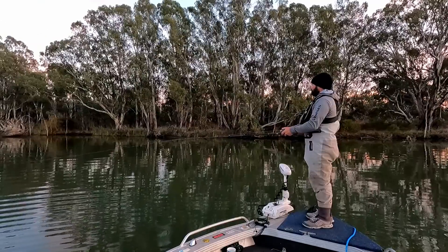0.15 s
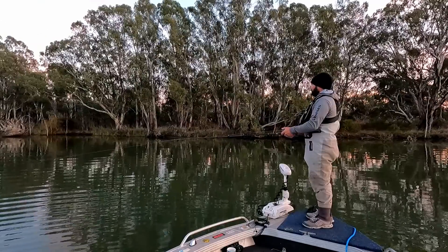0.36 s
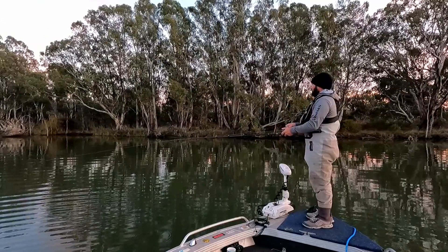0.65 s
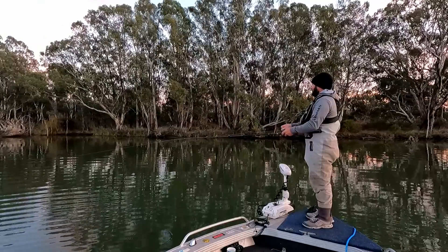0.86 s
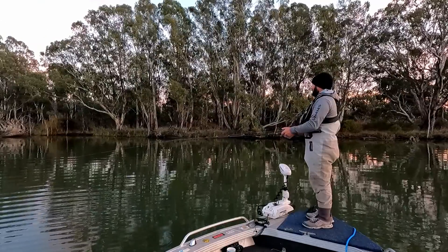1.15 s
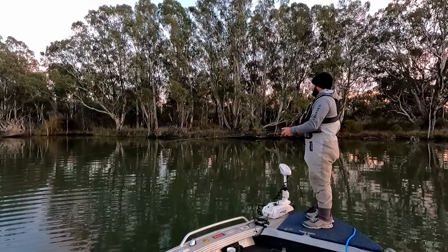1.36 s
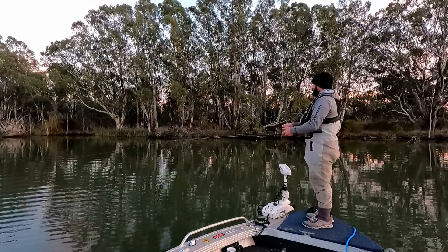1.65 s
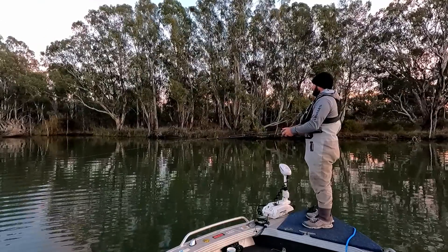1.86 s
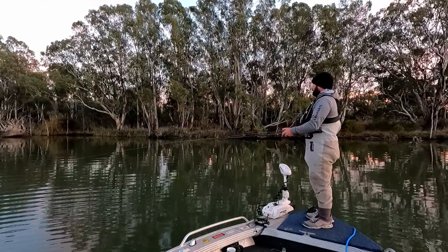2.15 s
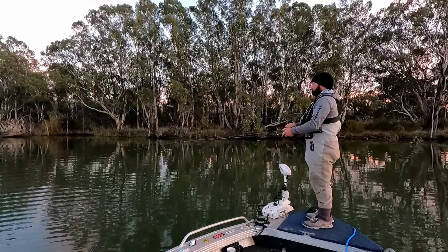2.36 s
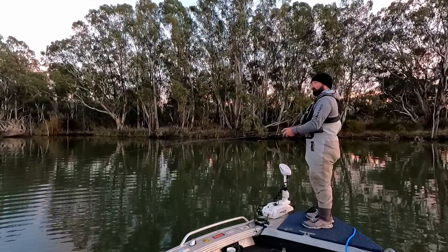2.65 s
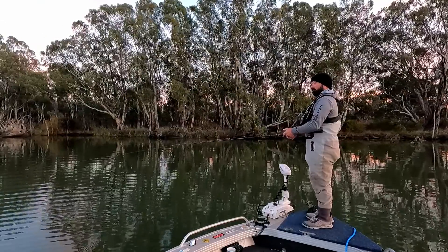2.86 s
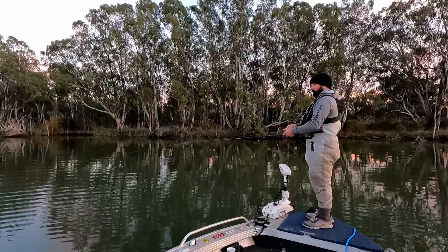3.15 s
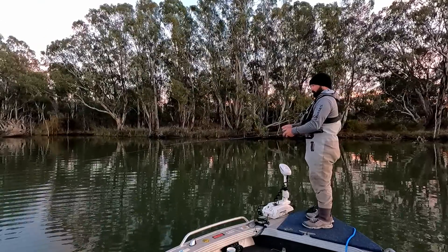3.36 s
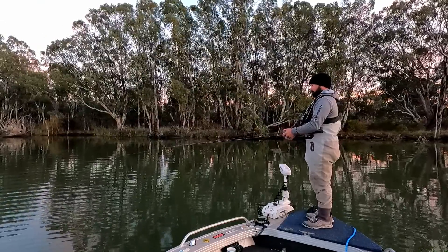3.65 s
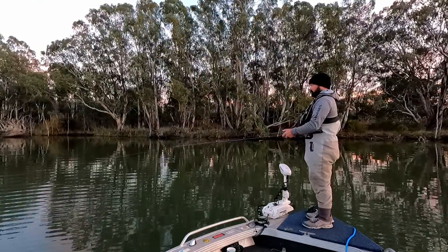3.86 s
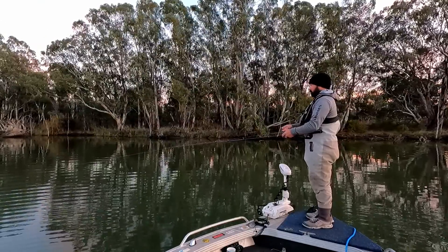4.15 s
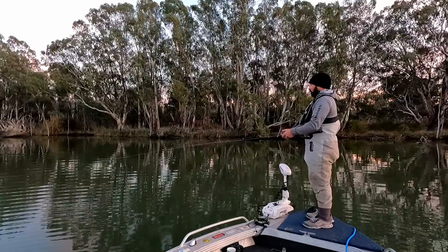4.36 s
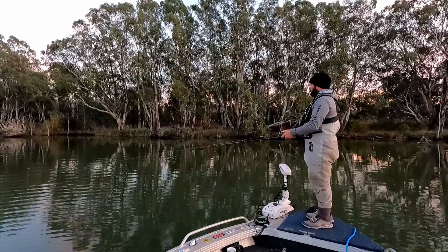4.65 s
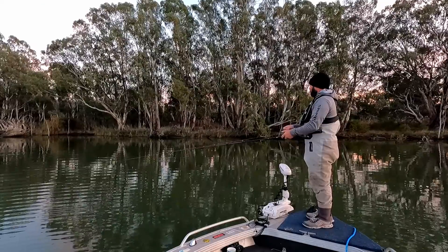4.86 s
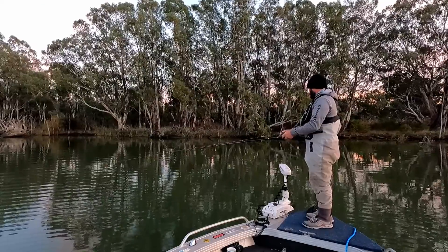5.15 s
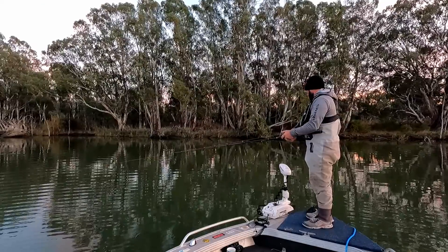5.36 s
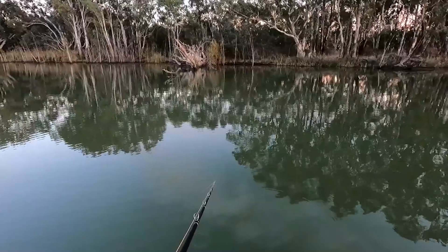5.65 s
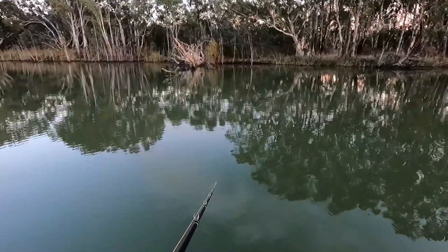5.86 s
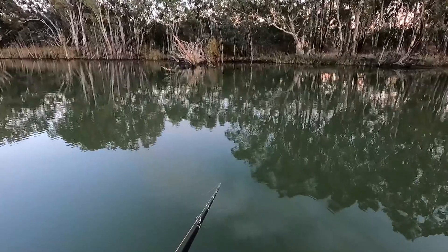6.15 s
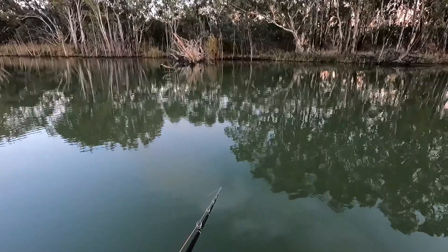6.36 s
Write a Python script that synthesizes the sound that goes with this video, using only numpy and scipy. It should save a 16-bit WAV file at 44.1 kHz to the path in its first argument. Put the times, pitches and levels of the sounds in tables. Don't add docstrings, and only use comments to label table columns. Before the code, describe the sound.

Outdoor river ambience dominated by a nasal, raspy parrot flock, with short chirps, scooping squawks, jagged quavers and long falling moans over a blurred far chorus. Faint low air and water rumble lies below. After a loud falling wail past four seconds the calls thin out. A brief total silence follows, then a louder perspective from the boat brings a squawk, a click and knock of loose tackle, a soft thump and more birds.

```python
import sys
import numpy as np
from scipy import signal
from scipy.fft import rfft, irfft
from scipy.io import wavfile
from scipy.ndimage import uniform_filter1d

SR = 44100
rng = np.random.default_rng(int(sys.argv[2]) if len(sys.argv) > 2 else 0)


def bounce(signal):
    frames = np.transpose(np.atleast_2d(signal))
    limited = np.clip(frames, -1, 1)
    pcm = np.round(limited * 32767).astype(np.int16)
    wavfile.write(sys.argv[1], SR, pcm)


def magnitude_from_level(level_db):
    exponent = np.asarray(level_db, float) / 20
    return 10 ** exponent


N = 286209

# time in seconds, effort in dB, brightness in dB.
CROWD = [
    [(0, -28.5, 3.5), (.34, -35, -3.5), (.84, -31.5, 2), (.9, -36.5, 0.5), (1.92, -40, -3.5),
     (2.24, -34, 0.5), (2.75, -32.5, -3), (3.26, -33.5, 3), (3.42, -38.5, -4), (3.76, -41, -6),
     (4.01, -33.5, 1), (4.58, -40, 2.5), (4.66, -30, 0), (4.72, -32, 1), (4.79, -32.5, -5),
     (5.3, -37.5, 5.5), (5.4, -41.5, 1.5), (5.6, -43.5, 1)],
    [(5.9, -26, -1), (6.49, -29, -1)],
]
# start in seconds, tick in dB, knock in dB, knock pitch in Hz, thump in dB.
KNOCKS = [
    (5.901, -33, -27, 720, -46),
    (6.105, -70, -45, 280, -48),
    (5.973, -44, -60, 500, -70),
    (3.04, -80, -52, 300, -90),
]
CUT_S, BACK_S, FADE_S = 5.6058, 5.85, 0.07
SLUR_S = .007


def evened(x):
    return x / np.sqrt(np.mean(x ** 2) + 1e-20)


def read(points, hz):
    f, value = np.transpose(points)
    return np.interp(np.log(hz + 1), np.log(f + 1), value)


def curves(tables):
    s, *columns = np.transpose(np.concatenate(tables))
    return [np.interp(np.arange(N) / SR, s, c) for c in columns]


def add(mix, s, sound):
    part = mix[max(round(s * SR), 0):][:len(sound)]
    part += sound[:len(part)]


def shaped(x, gain):
    return irfft(rfft(x) * gain(np.fft.rfftfreq(len(x), 1 / SR)), len(x))


def band(x, lo_hz, hi_hz):
    return signal.sosfilt(signal.butter(3, [lo_hz, hi_hz], "band", fs=SR, output="sos"), x)


def drift(size, span):
    smooth = uniform_filter1d(rng.standard_normal(size), span, axis=-1)
    return evened(uniform_filter1d(smooth, span, axis=-1))


def glide(length, start, middle, end):
    u = np.linspace(-1, 1, max(round(length * SR), 64))
    return middle + u * (end - start) / 2 + u ** 2 * ((start + end) / 2 - middle)


def trees(x, t60, dull_hz):
    t = np.arange(round(.8 * SR)) / SR
    hits = (rng.random(len(t)) < .06) * (t > .008)
    taps = band(rng.standard_normal(len(t)) * hits * magnitude_from_level(-60 * t / t60), 410, dull_hz)
    return signal.fftconvolve(x, taps / np.linalg.norm(taps))[:N]


def voice(hz, db, mouth_hz, bright, rough, lift_db=9, swell_db=3.5):
    # frequency in Hz, level in dB.
    throat = [(400, -16.5), (700, -11.5), (1050, -7.5), (1500, -3.5), (1950, 0), (2300, 5.5), (3000, 0.5),
              (4000, -8), (5000, -11.5), (6500, -23), (7600, -61), (8800, -73.5)]
    chance = rng.standard_normal((13, 1))
    order = np.arange(1, 14)[:, None]
    turns = np.cumsum(hz * (1 + .0016 * rough[0] + .005 * rough[2])) / SR
    tilt_db = bright * np.log2(order * hz / 2300)
    shimmer_db = swell_db * np.sin(turns / 14 * (1 + .3 * chance) + 5 * chance)
    mouth_db = lift_db / (1 + ((order * hz - mouth_hz) / 330) ** 2)
    sizes = magnitude_from_level(read(throat, order * hz) + tilt_db + mouth_db + shimmer_db)
    sizes = sizes / np.sqrt((sizes ** 2).sum(0) / 2)
    overtones = sizes * np.cos(2 * np.pi * order * turns + 2 * chance)
    return magnitude_from_level(db) * overtones.sum(0) * (1 + .1 * rough[1])


def syllables(out, rough):
    # start in seconds, pitch in Hz, level in dB, overtone lifted by the mouth.
    chirps = [
        (1.359, 650, -47, 2),
        (2.614, 755, -42, 3),
        (2.66, 755, -41, 2),
        (2.911, 960, -44, 4),
        (3.975, 724, -41, 3),
        (5.173, 910, -38, 4),
        (5.1, 930, -43, 3),
    ]
    squawks = [(.654, 692, -38, 3), (.956, 703, -43, 3), (1.316, 659, -47, 3), (1.408, 990, -50, 3),
               (1.962, 745, -43, 3), (2.208, 836, -40, 3), (2.346, 604, -40, 5), (3.322, 720, -42, 3),
               (3.396, 648, -47, 7), (3.473, 722, -46, 3), (3.642, 647, -47, 3), (6.237, 912, -39, 2),
               (6.361, 998, -42, 4)]
    scoops = [
        (.626, 730, -39, 1),
        (.81, 685, -35, 4),
        (1.511, 565, -43, 4),
        (3.27, 620, -40, 3),
        (3.765, 685, -45, 3),
        (4.005, 736, -41, 3),
        (4.381, 820, -38, 2),
        (5.479, 730, -48, 3),
        (6.182, 800, -38, 3),
        (6.41, 880, -38, 3),
    ]
    caws = [(.14, 737, -40, 3), (.789, 746, -40, 6), (1.645, 548, -45, 4), (3.206, 604, -37, 3),
            (3.59, 748, -42, 3), (3.9, 700, -45, 3), (4.675, 639, -44, 3), (.04, 690, -43, 1),
            (.17, 590, -42, 1), (.25, 570, -44, 1), (.45, 745, -44, 1), (.54, 705, -44, 1),
            (1.49, 620, -48, 1), (5.163, 805, -42, 4), (5.4, 772, -51, 3), (6.05, 742, -38, 3)]
    # length in seconds, start and end pitch as shares of the middle pitch.
    kinds = [
        (.03, .99, .995),
        (.048, 1.012, .98),
        (.048, .96, .99),
        (.075, .985, .985),
    ]
    bright = curves(CROWD)[1] - 2
    for table, (length, start, end) in zip((chirps, squawks, scoops, caws), kinds):
        for s, pitch, db, overtone in table:
            hz = pitch * glide(length + .0087, start, 1, end)
            at = min(round(s * SR), N - 6000)
            sound = voice(hz, db + 1.5, overtone * pitch, bright[at], rough[:, at:at + len(hz)])
            add(out, s - .005, sound * signal.windows.tukey(len(hz), .45))


def phrase(rows, tilt_db, lift_db, rough):
    s, *columns = np.transpose(rows)
    t = np.arange(s[0] - SLUR_S, s[-1] + SLUR_S, 1 / SR)
    hz, db, mouth_hz = (uniform_filter1d(np.interp(t, s, c), round(SLUR_S * SR)) for c in columns)
    throb_db = 2.2 * rough[2, :len(t)][::-1]
    sound = voice(hz, db + 1 + throb_db, mouth_hz, tilt_db, .5 * rough[:, :len(t)], lift_db, swell_db=2)
    edge = np.clip(np.minimum(t - t[0], t[-1] - t) / (2 * SLUR_S), 0, 1)
    return (sound * edge)[max(round((SLUR_S - s[0]) * SR), 0):]


def phrases(out, rough):
    # time in seconds, pitch in Hz, level in dB, mouth resonance in Hz.
    early = [
        [(0.0, 775.0, -34.0, 2330.0), (0.02, 805, -32, 4000), (0.06, 740.0, -31.0, 2220.0),
         (0.095, 793.0, -32.0, 3200.0), (0.125, 690.0, -36.0, 2070.0)],
        [(0.438, 800, -40, 2400), (0.45, 815, -35, 2450), (0.46, 880, -46, 2640), (0.475, 925, -43, 2770),
         (0.498, 825, -36, 2480), (0.512, 835, -41, 4180), (0.53, 938, -33, 2810), (0.548, 925, -35, 3700),
         (0.572, 810, -42, 2430)],
        [(0.59, 669, -43, 2050), (0.625, 715, -44, 2140), (0.66, 730, -47, 1460), (0.685, 685, -37, 2740),
         (0.71, 705, -40, 2120), (0.735, 755, -39, 1510), (0.75, 740, -43, 2960)],
        [(0.405, 720, -48, 1450), (0.43, 830, -43, 1660), (0.45, 760, -46, 3050)],
        [(0.75, 730, -42, 2200), (0.77, 760, -36, 2280), (0.795, 740, -36, 2220), (0.81, 700, -40, 2100)],
        [(0.865, 802.0, -42.0, 2410.0), (0.89, 795.0, -43.0, 3970.0), (0.91, 765.0, -44.0, 1530.0)],
        [(0.99, 781.0, -48.0, 1560.0), (1.06, 847.0, -42.0, 5080.0), (1.085, 790.0, -39.0, 5530.0),
         (1.11, 804.0, -38.0, 3210.0), (1.14, 762.0, -40.0, 4570.0), (1.17, 818.0, -40.0, 3270.0),
         (1.2, 840.0, -44.0, 3360.0), (1.23, 739.0, -38.0, 5180.0), (1.285, 804.0, -43.0, 2410.0)],
        [(1.02, 669.0, -47.0, 4680.0), (1.07, 719.0, -49.0, 5040.0)],
        [(2.04, 886.0, -54.0, 5310.0), (2.06, 895.0, -45.0, 2680.0), (2.09, 832.0, -42.0, 2490.0),
         (2.12, 911.0, -43.0, 3650.0), (2.142, 895.0, -41.0, 2690.0)],
    ]
    late = [
        [(2.435, 809.0, -45.0, 2430.0), (2.47, 770.0, -46.0, 1540.0), (2.515, 825.0, -46.0, 4950.0),
         (2.55, 782.0, -38.0, 3130.0), (2.585, 768.0, -34.0, 3070.0), (2.655, 830.0, -35.0, 3320.0),
         (2.675, 780, -44, 3100)],
        [(2.68, 720, -43, 2150), (2.694, 700, -39, 2100), (2.712, 760, -38, 3040), (2.73, 780, -41, 3100)],
        [(2.51, 720, -42, 2160), (2.54, 790, -40, 2370), (2.56, 800, -36, 2400), (2.58, 745, -37, 2240),
         (2.63, 735, -39, 2200)],
        [(2.735, 800, -39, 2400), (2.762, 842, -31, 2520), (2.78, 790, -36, 3100), (2.8, 750, -37, 3000),
         (2.815, 740, -41, 2960), (2.85, 657.0, -42.0, 1310.0)],
        [(3.015, 845, -42, 2540), (3.038, 895, -36, 2680), (3.055, 888, -33, 2660), (3.073, 845, -36, 2540)],
    ]
    last = [
        [(5.855, 805, -34, 2420), (5.875, 760, -38, 2280)],
        [(3.74, 720, -48, 5100), (3.76, 737, -44, 2200), (3.8, 797.0, -46.0, 4780.0),
         (3.825, 760.0, -41.0, 3040.0), (3.86, 757.0, -41.0, 1510.0), (3.88, 713.0, -46.0, 1430.0)],
        [(4.18, 830, -46, 2600), (4.192, 885, -40, 2650), (4.21, 815, -44, 4100), (4.228, 935, -42, 3740),
         (4.25, 905, -38, 2730), (4.268, 800, -44, 3200)],
        [(0.6, 790, -45, 2400), (0.615, 815, -40, 2440), (0.635, 867, -40, 4330), (0.67, 832, -42, 2490)],
        [(4.325, 880.0, -37.0, 2640.0), (4.36, 855.0, -38.0, 2570.0)],
        [(5.01, 752.0, -44.0, 2250.0), (5.075, 820.0, -41.0, 1640.0), (5.1, 773.0, -37.0, 3090.0),
         (5.14, 823.0, -41.0, 3290.0)],
        [(5.24, 766.0, -40.0, 3060.0), (5.26, 759.0, -37.0, 3040.0), (5.285, 790.0, -39.0, 1580.0),
         (5.31, 769.0, -49.0, 5380.0)],
        [(6.1, 795.0, -42.0, 2390.0), (6.14, 746.0, -39.0, 2990.0), (6.18, 684.0, -36.0, 4110.0)],
        [(6.29, 691.0, -37.0, 3450.0), (6.335, 734.0, -43.0, 1470.0)],
    ]
    glides = [
        [(0.19, 663.0, -35.0, 1990.0), (0.25, 652.0, -39.0, 1900.0), (0.285, 601.0, -45.0, 1200.0)],
        [(0.31, 735, -47, 3670), (0.35, 714, -43, 3570), (0.4, 686, -45, 3430)],
        [(1.44, 490.0, -46.0, 1470.0), (1.475, 597.0, -44.0, 4180.0), (1.5, 655.0, -41.0, 1310.0),
         (1.52, 650.0, -50.0, 1300.0)],
        [(2.945, 650, -41, 1950), (3.0, 679.0, -40.0, 2040.0), (3.04, 704.0, -37.0, 2110.0),
         (3.08, 622.0, -41.0, 3730.0), (3.12, 600.0, -40.0, 1200.0)],
        [(2.96, 815.0, -43.0, 1630.0), (3.05, 783, -39, 2350), (3.13, 748.0, -37.0, 2990.0),
         (3.2, 717.0, -36.0, 1430.0), (3.26, 661.0, -40.0, 1320.0), (3.31, 614.0, -44.0, 1230.0)],
        [(4.045, 565, -44, 1700), (4.085, 578, -40, 2300), (4.12, 582, -35, 1750), (4.15, 570, -38, 1710),
         (4.18, 560, -39, 2240), (4.21, 558, -36, 2230), (4.25, 540, -38, 1620), (4.295, 530, -38, 2120),
         (4.34, 505, -42, 2020)],
        [(3.21, 598, -42, 1800), (3.235, 600, -38, 1800), (3.263, 600, -35, 2400), (3.31, 590, -38, 1780)],
        [(4.29, 724.0, -40.0, 2170.0), (4.33, 735.0, -37.0, 2210.0), (4.38, 752.0, -30.0, 2260.0)],
        [(4.78, 545, -50, 1090), (4.82, 548, -44, 1100), (4.85, 595, -42, 1190), (4.9, 580, -44, 1160),
         (4.95, 573, -47, 2860), (5.0, 545, -49, 2200), (5.06, 560, -46, 1120)],
    ]
    # tilt in dB per octave, mouth lift in dB
    for table, colour in ((early + late + last, (1.5, 9)), (glides, (-3.5, 11))):
        for rows in table:
            s = rows[0][0]
            add(out, s - SLUR_S, phrase(rows, *colour, rough[:, round(s * SR / 2):]))


def wail(length, top_hz, end_hz, db, rough):
    half_hz, gape_hz, shut_hz = 2130, 2720, 1470
    t = np.arange(0, length, 1 / SR)
    hz = top_hz - (top_hz - end_hz) * (t / length) ** 2 - 33.67 * np.exp(-t / length / .12)
    shut = np.clip(1 - (length - t) / .029, 0, 1)
    mouth_hz = half_hz + (gape_hz - half_hz) * np.clip((t - .12) / .054, 0, 1)
    mouth_hz = mouth_hz + (shut_hz - mouth_hz) * np.minimum(2 * shut, 1)
    level_db = db - 12 * np.clip(1 - t / min(.04, length / 5), 0, 1) - 8 * shut
    sound = voice(hz, level_db, mouth_hz, -.8, .33 * rough[:, :len(t)], lift_db=13)
    return sound * signal.windows.tukey(len(t), .1)


def wails(out, rough):
    # start in seconds, length in seconds, top pitch in Hz, end pitch in Hz, level in dB.
    cries = [
        (2.02, 0.29, 811, 686, -34.5),
        (4.33, 0.33, 769.3, 638, -30),
        (5.276, 0.071, 873, 742, -32.5),
        (5.923, 0.072, 735, 671.5, -21),
    ]
    for s, *cry in cries:
        add(out, s, wail(*cry, rough))


def whistles(rough):
    # start in seconds, length in seconds, start pitch in Hz, end pitch in Hz, level in dB.
    notes = [(1.81, .045, 935, 945, -47), (1.645, .09, 1090, 1110, -49), (3.96, .1, 1120, 1150, -47),
             (1.85, .115, 1150, 1115, -47), (3.36, .1, 7850, 7400, -77), (3.396, .012, 4600, 4450, -47),
             (3.416, .014, 4620, 4480, -45), (3.383, .008, 5300, 4500, -53), (3.397, .01, 5550, 5450, -59),
             (3.63, .05, 4500, 4420, -53), (3.68, .12, 4520, 4450, -54), (3.412, .01, 5400, 5300, -59),
             (5.52, .075, 4050, 4210, -55), (6.38, .108, 860, 945, -44), (4.36, .07, 1070, 830, -47),
             (1.99, .025, 5300, 5060, -56), (1.807, .012, 4750, 4300, -48), (1.832, .016, 4880, 4900, -51),
             (6.135, .03, 5300, 4900, -47), (1.745, .032, 4050, 4230, -48), (1.775, .042, 5330, 5200, -51),
             (1.733, .017, 5520, 5020, -53), (1.845, .014, 4150, 3980, -49), (2.23, .11, 1480, 1300, -45),
             (2.04, .025, 5260, 5010, -53), (5.95, .065, 1420, 1310, -32), (2.572, .022, 5450, 5250, -52),
             (2.61, .015, 4650, 4750, -49), (4.255, .014, 4750, 4600, -50), (3.85, .025, 5400, 5050, -53),
             (6.3, .03, 4950, 5100, -50)]
    out = np.zeros(N)
    for s, length, start, end, db in notes:
        hz = glide(length, start, (start + end) / 2, end)
        flutter = rough[:, round(s * SR / 2):][:, :len(hz)]
        turns = np.cumsum(hz * (1 + .005 * flutter[0])) / SR
        tone = magnitude_from_level(db + 2 + 2 * flutter[1]) * np.sin(2 * np.pi * turns)
        add(out, s, tone * signal.windows.tukey(len(hz), .5))
    return out


def near_birds(rough):
    out = np.zeros(N)
    syllables(out, rough)
    wails(out, rough)
    phrases(out, rough)
    out = band(out, 390, 13000) + whistles(rough)
    return out + magnitude_from_level(-13) * trees(out, .25, 6000)


def crowd(wobbles, count=13):
    # frequency in Hz, density in dB per Hz.
    colour = [(210, -58), (350, -23), (466, -14), (670, -16), (782, -17), (938, -1), (1440, -12.5),
              (1800, -6), (2240, -3.5), (2550, -3.5), (3020, -7.5), (3440, -10.5), (4570, -16), (5340, -24),
              (7780, -43.5), (10100, -71.5), (17100, -120)]
    frames = np.arange(0, N + 128, 64)
    size = (count, len(frames))
    quaver = .024 * drift(size, 11)
    pitch = 715 * np.exp(.07 * rng.standard_normal((count, 1)) + .055 * drift(size, 60) + quaver)
    gate = np.clip(2.77 * (drift(size, 22) - .5), 0, 1)
    pulses = np.zeros(N)
    for hz, beak in zip(pitch, gate):
        unsteady = 1 + .002 * np.roll(wobbles, rng.integers(N))
        half = np.pi * np.cumsum(np.interp(np.arange(N), frames, hz) * unsteady) / SR
        comb = np.sin(23 * half) / (np.sin(half) + 1e-9) - 1
        pulses += np.clip(comb, -23, 23) * np.interp(np.arange(N), frames, beak)
    pulses = pulses / np.sqrt(uniform_filter1d(pulses ** 2, 3000) + .2 * np.var(pulses))
    scatter = rng.standard_normal(300) * np.exp(-np.arange(300) / 80)
    pulses = evened(signal.fftconvolve(pulses, scatter)[:N])
    pulses = evened(shaped(pulses, lambda hz: 1 / (abs(rfft(scatter, N)) + .5)))
    blur = evened(rng.standard_normal(N))
    sound = .75 * pulses + .5 * evened(trees(pulses, .4, 9000)) + .25 * blur
    sound = shaped(sound, lambda hz: magnitude_from_level(read(colour, hz)))
    level_db, bright_db = curves(CROWD)
    low_db = 2.33 - .36 * (level_db + 34.5)
    low = shaped(sound, lambda hz: 1 / (1 + (hz / 1050) ** 6))
    high = shaped(sound, lambda hz: 1 - 1 / (1 + (hz / 3800) ** 6))
    sound = sound + (magnitude_from_level(low_db) - 1) * low + (magnitude_from_level(bright_db) - 1) * high
    return magnitude_from_level(level_db - 2.5) * sound / np.std(sound)


def tackle():
    out, t = np.zeros(N), np.arange(4000) / SR
    for s, tick_db, knock_db, knock_hz, thump_db in KNOCKS:
        tick = magnitude_from_level(tick_db - 60 * t / .0034) * band(rng.standard_normal(len(t)), 860, 7700)
        knock = magnitude_from_level(knock_db - 60 * t / .057) * np.sin(2 * np.pi * knock_hz * t)
        turns = 72.4 * (t + .029 * (1 - np.exp(-t / .0039)))
        thump = magnitude_from_level(thump_db) * t / .01 * np.exp(1 - t / .013) * np.sin(2 * np.pi * turns)
        add(out, s, tick + knock + thump)
    return out


def rumble():
    # frequency in Hz, density in dB per Hz.
    colour = [(59, -59.5), (100, -26.5), (178, -10.5), (242, -14), (397, -11.5), (476, -7.5), (600, -4),
              (780, -41), (1320, -120)]
    t = np.arange(N) / SR
    on_bank = t < BACK_S
    wash_db = np.where(on_bank, -60.5, -45)
    deep_db = np.where(on_bank, -83.5, -66)
    fizz_db = np.where(on_bank, -104, -87)
    settle_db = 36 * np.clip(t - KNOCKS[1][0], 0, 1)
    gust_db = 23.5 * np.exp(-abs(t - 2.01) / .22)
    a, b, c = rng.standard_normal((3, N))
    wash = evened(shaped(a, lambda hz: magnitude_from_level(read(colour, hz))))
    deep = evened(band(b, 28, 110) * magnitude_from_level(4.1 * drift(N, 2500)))
    fizz = evened(shaped(c, lambda hz: (hz > 9300) * (hz < 11300)))
    thin = evened(shaped(c[::-1], lambda hz: (hz > 9600) * (hz < 12600) * magnitude_from_level(-abs(hz - 11800) / 150)))
    fizz = np.where(on_bank, thin * magnitude_from_level(6.9 * drift(N, 1500)), fizz)
    return magnitude_from_level(wash_db - settle_db) * wash + magnitude_from_level(deep_db - settle_db + gust_db) * deep + magnitude_from_level(fizz_db) * fizz


def scene():
    rough = drift((2, N), 110)
    rough = np.vstack([rough, drift(N, 450)])
    return (near_birds(rough) + crowd(rough[0]) + tackle() + rumble())[None]


def low_pass(x):
    return signal.sosfilt(signal.butter(12, 12726, fs=SR, output="sos"), x)


def record(dry):
    t = np.arange(N) / SR
    dry = signal.sosfilt(signal.butter(2, 60, "high", fs=SR, output="sos"), dry)
    dry = shaped(dry[0], lambda hz: magnitude_from_level(-12 * np.clip((hz - 8300) / 600, 0, 1) * (hz < 9300)))[None]
    stop = np.clip((CUT_S - t) / .002, 0, 1)
    fade_in = np.clip((t - BACK_S) / FADE_S, 0, 1)
    return low_pass(dry * np.where(t < CUT_S, stop, fade_in))


dry = scene()
out = record(dry)
bounce(out)
```